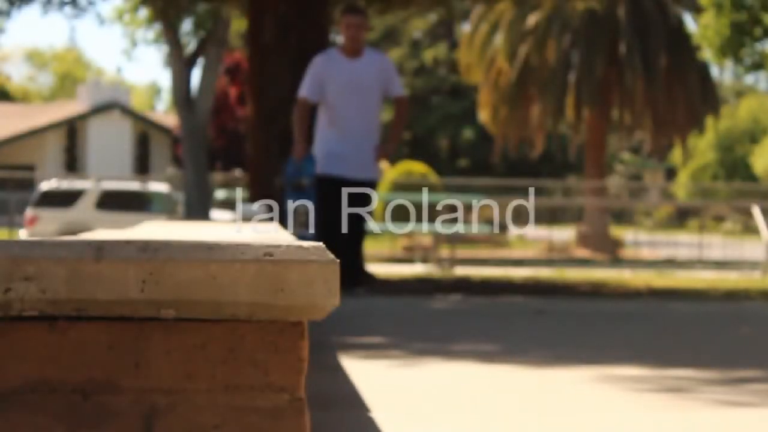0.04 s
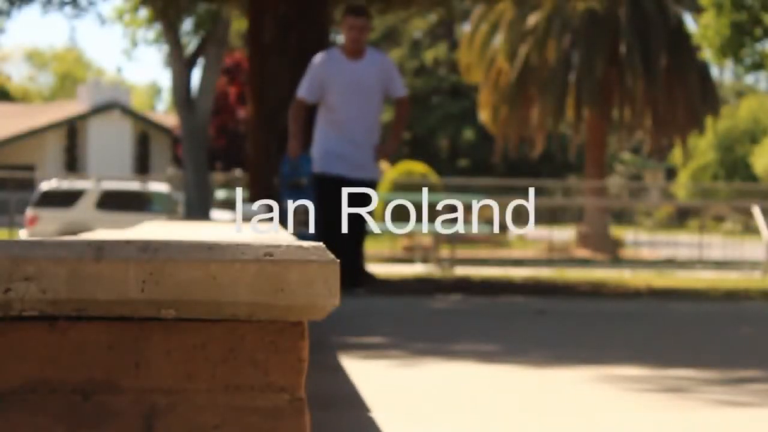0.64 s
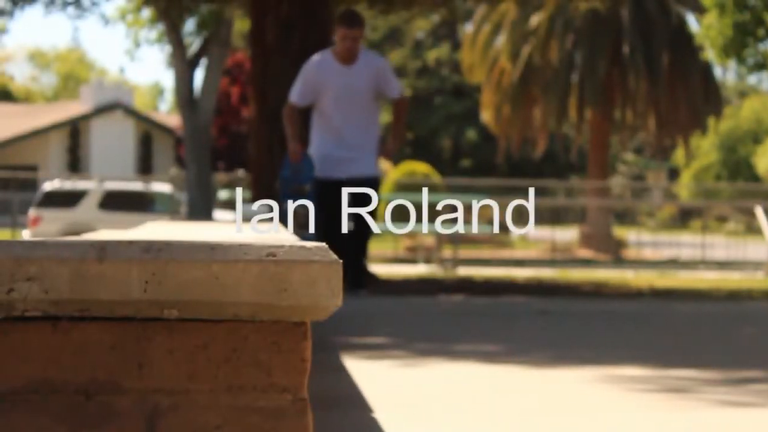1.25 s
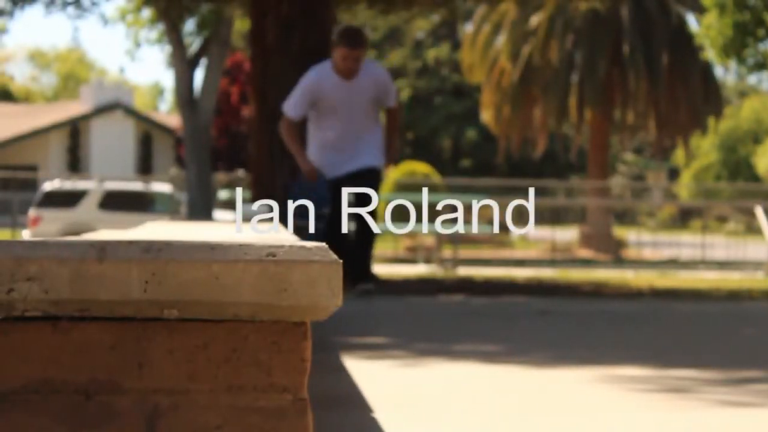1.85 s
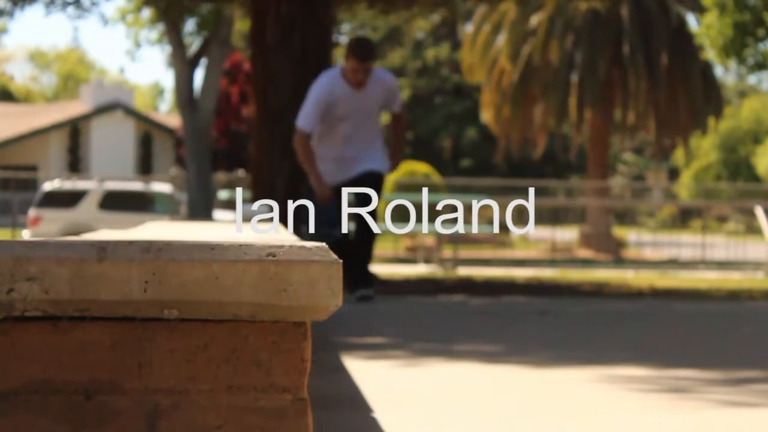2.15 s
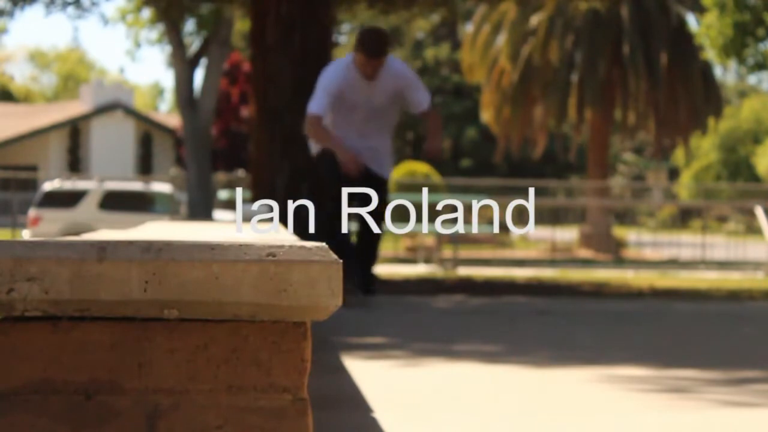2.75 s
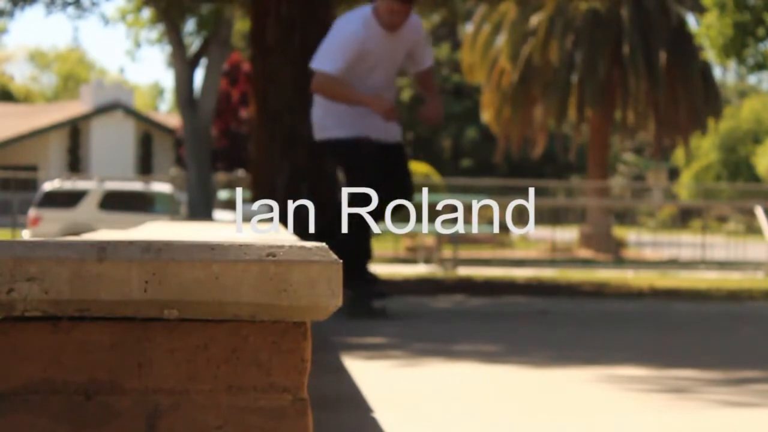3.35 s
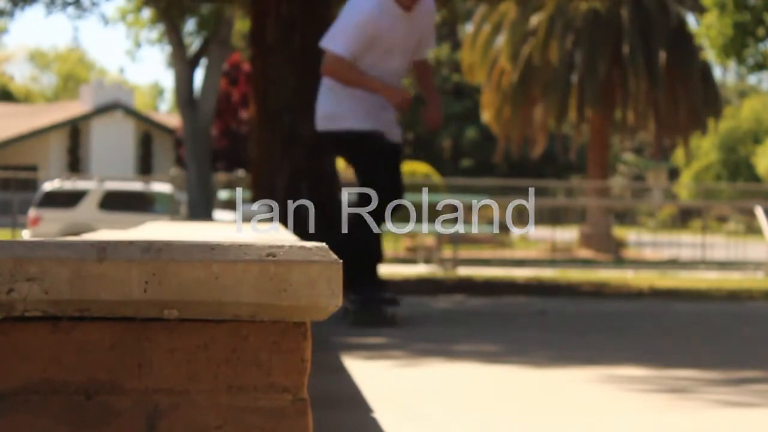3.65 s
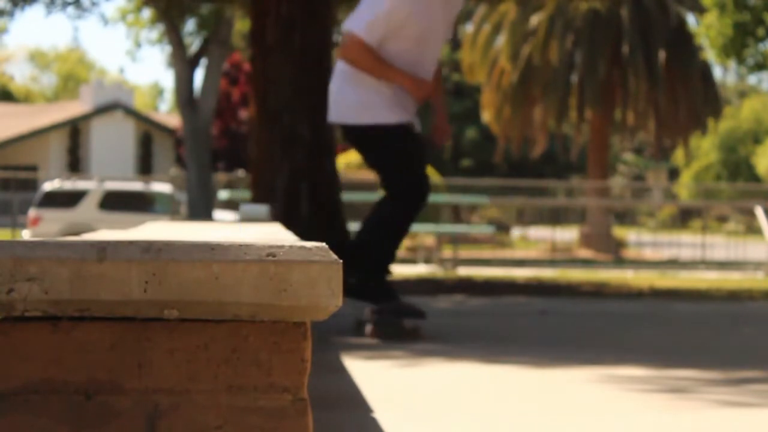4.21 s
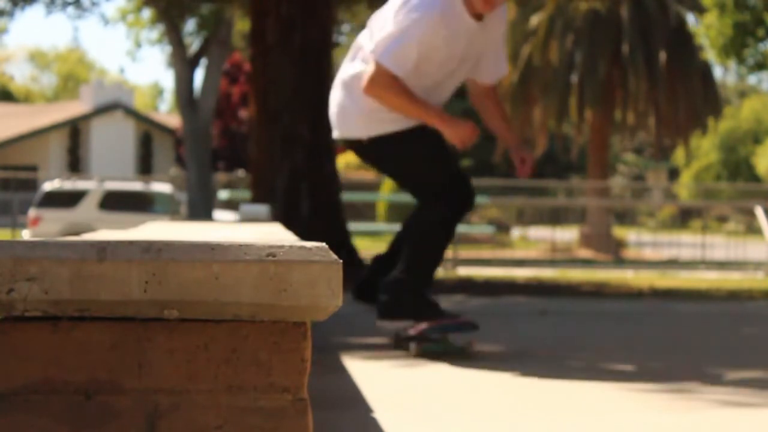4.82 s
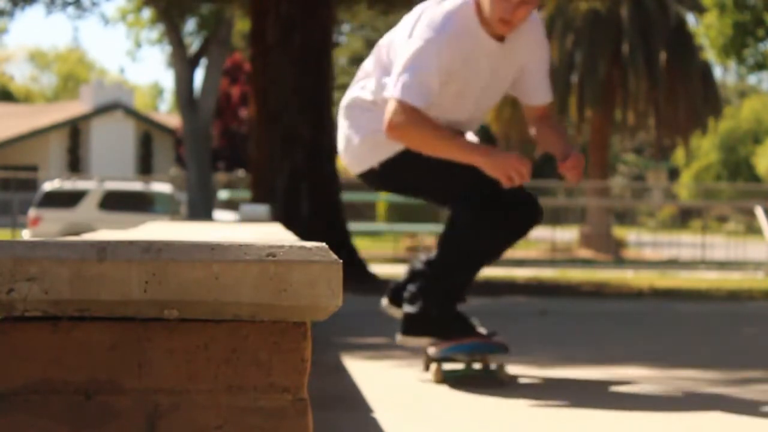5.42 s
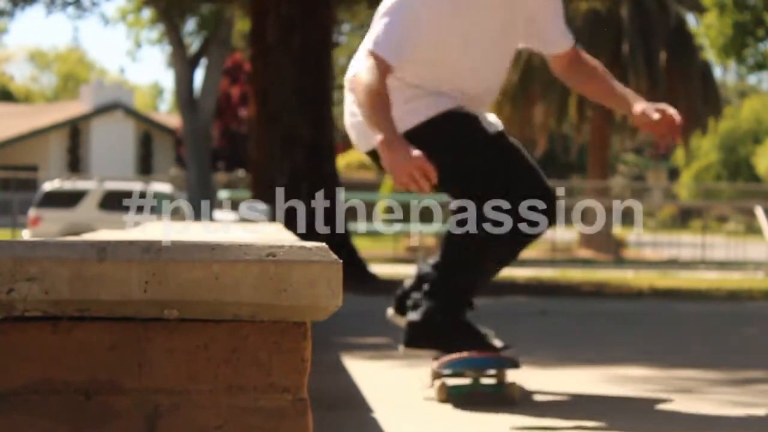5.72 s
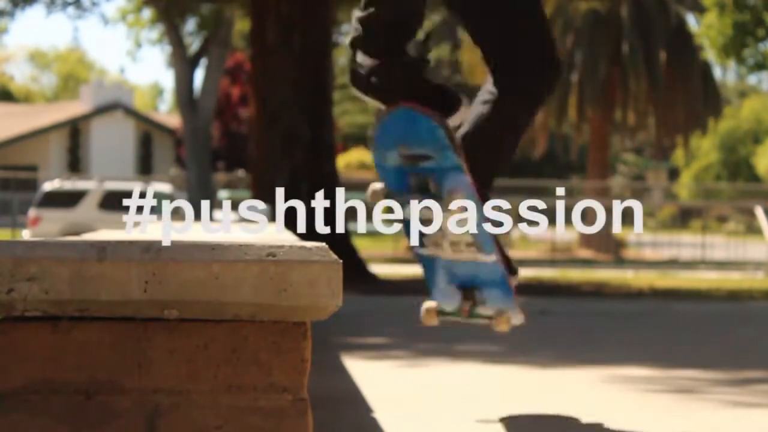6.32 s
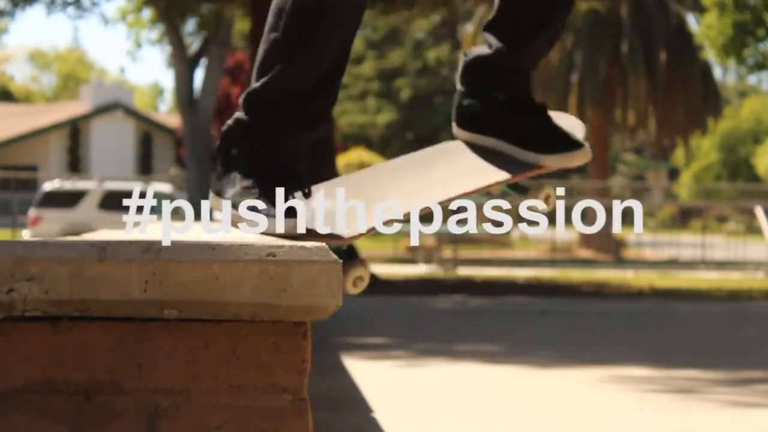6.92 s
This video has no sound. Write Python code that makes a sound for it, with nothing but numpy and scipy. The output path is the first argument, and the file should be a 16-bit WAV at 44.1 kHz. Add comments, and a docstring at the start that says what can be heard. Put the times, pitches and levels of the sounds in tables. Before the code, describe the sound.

A soft hush of distant traffic and leaves lies over a quiet street throughout. A faint step comes at about 1.8 seconds, then a brief shoe scuff. Around 2.5 seconds a skateboard drops onto concrete with three clacks and rolls with a hollow sound. Feet thump onto the deck at 2.9 seconds, with two more knocks at about 3.3 and 3.6. The wheels rumble closer, growing louder and grittier, with short wavering hums from the board. At 6.2 seconds the tail pops with a very loud, sharp crack, and the rolling drops away. A third of a second later the board slams onto a ledge with a second crack and a thud of feet. Both hits are close, leave a thin echo and briefly overload the microphone, which dips in level. The board rolls along the ledge with light knocks and faint metal jingles until about 7 seconds.

```python
"""A skateboard jump onto a ledge

On a quiet street a skateboarder steps off, drops his board, jumps on and rolls closer over concrete.
He snaps the tail down, flies for a third of a second, lands on a ledge and rolls along on two wheels.
Each blow makes the board ring, rattle and crack; rough ground makes it roar; loose metal jingles faintly.
The loudest cracks overload the microphone, which turns itself down for a moment."""
import sys
import numpy as np
from scipy import signal
from scipy.fft import rfft, irfft, next_fast_len
from scipy.io import wavfile
from scipy.ndimage import uniform_filter1d

SR = 44100
rng = np.random.default_rng(int(sys.argv[2]) if len(sys.argv) > 2 else 0)


def unload_audio(sound):
    """Save the sound as a 16-bit wav file, at the path given as the first command line argument."""
    columns = np.transpose(np.atleast_2d(sound))
    # keep every value between -1 and 1, then stretch to whole-number steps
    steps = np.round(np.clip(columns, -1, 1) * 32767)
    wavfile.write(sys.argv[1], SR, steps.astype(np.int16))


N = 311742
TIME = np.arange(N) / SR

# The tones of deck, axles and wheels. Each row: pitch in Hz, level in dB, seconds to fade by 60 dB (t60).
BOARD_TONES = [(105, -20, 0.13), (168.9, -24.5, 0.69), (236, -5, 0.029), (280, 1.5, 0.071),
               (378, -12.5, 0.31), (555, 1, 0.066), (606, -8, 0.037), (684.7, -1, 0.12), (755, 0, 0.018),
               (915, -14.5, 0.25), (1002, -12, 0.045), (1112, -14, 0.2), (1291, -4.5, 0.16),
               (1501, -6.5, 0.095), (1801, -6, 0.11), (1840, -8, 0.021), (2180, -6.5, 0.11)]
# The dense rattle under those tones. Each row: frequency in Hz, level in dB.
RATTLE_COLOUR = [(40, -28), (100, -8), (250, -2), (450, -5.5), (800, -0.5), (1500, -5.5), (3000, -9),
                 (6000, 4), (12000, -3)]
# The bright crack of a hard hit. Each row: frequency in Hz, level in dB.
CRACK_COLOUR = [(300, 2), (1200, 4), (2200, 3.5), (3200, -3), (3800, -4), (4450, -7), (5300, -7.5),
                (5800, -14), (6500, -11), (9000, -15), (12000, -23.5)]

def board_blows(rattle_t60=0.12, crack_t60=0.04, chatter_t60=0.19, rise_s=0.00056, lowest_hz=85):
    """Each blow starts with a crack, rings the board's tones and shakes its loose parts."""
    out, t = np.zeros(N), TIME[:SR // 4]
    tone_hz, tone_db, tone_t60 = np.transpose(BOARD_TONES)
    for s, db, *spring, crack_db, stretch in [*wheel_knocks(), *foot_stomps(), *board_slams()]:
        strength, detune, side = rng.standard_normal((3, len(BOARD_TONES)))
        gains = from_db(tone_db + strength) * springy_contact(tone_hz, *spring)
        gains *= np.sign(side) / np.linalg.norm(gains)   # the sign depends on where the board is struck
        pitch = tone_hz * (1 + 0.0088 * detune)   # the rider's feet shift the tones
        ring = gains @ (np.sin(2 * np.pi * np.outer(pitch, t)) * fade(t, stretch * tone_t60[:, None]))
        rattle = noise(lambda hz: gain_at(RATTLE_COLOUR, hz) * springy_contact(hz, *spring), len(t))
        body = from_db(-2) * ring + from_db(-7) * rattle * fade(t, stretch * rattle_t60)
        crack = noise(lambda hz: gain_at(CRACK_COLOUR, hz), len(t))
        crack *= fade(t, stretch * crack_t60) + from_db(-13) * fade(t, stretch * chatter_t60)
        rise = 1 - np.exp(-t / rise_s)
        add(out, s, from_db(db) * (body + from_db(crack_db) * crack) * rise)
    return highpass(out, lowest_hz)   # a narrow deck gives off no deep bass


def springy_contact(hz, contact_hz, sharpness, boom_db, boom_hz):
    """A wheel or tail is a spring: it favours one pitch and passes little above. Weight adds a boom."""
    ratio = hz / contact_hz
    resonance = (1 - ratio ** 2) ** 2 + (ratio / sharpness) ** 2
    softness = 1 + (ratio / 1.7) ** 2
    boom = from_db(boom_db * bell(hz, boom_hz, 0.49 * boom_hz) ** 2)
    return boom / np.sqrt(resonance * softness)


# The tail pops, then an axle meets the ledge. Each row: start in seconds, level in dB, contact pitch
# in Hz, its sharpness, crack in dB, ring time factor, graze level in dB, seconds until the rebound.
BOARD_SLAMS = [(6.2271, 15, 940, 3, -9.5, 0.55, -17, 0.0265),
               (6.5597, 15.5, 1450, 7.2, -12.5, 0.25, 1, 0.0193)]

def board_slams(graze_s=0.00478, boom_db=-7.5, boom_hz=220):
    """An edge grazes first, then comes the hard blow and a bright rebound."""
    for s, db, hz, sharpness, crack_db, stretch, graze_db, rebound_s in BOARD_SLAMS:
        yield s - graze_s, graze_db, hz, sharpness, boom_db, boom_hz, -29, stretch
        yield s, db, hz, sharpness, boom_db, boom_hz, crack_db, stretch
        yield s + rebound_s, db - 12.5, 1700, 1.8, boom_db, boom_hz, -25, 0.76


# Feet come down. Each row: start in seconds, slap level in dB, contact pitch in Hz, crack in dB,
# ring time factor, seconds until the thud, thud level in dB, boom pitch in Hz.
FOOT_STOMPS = [(1.808, -24, 650, -23, 1.15, 0.002, -18.5, 235), (2.889, -7, 2200, -8, 0.95, 0.0092, 5, 293),
               (2.9415, -9, 860, -16, 1.35, 0.0105, -8.5, 340),
               (3.3216, -2.5, 774, -16, 1.4, 0.011, -8, 240), (3.624, -3, 910, -19, 1.05, 0.017, -3.5, 291),
               (6.588, -3.5, 1390, -15, 0.91, 0.008, 7, 247.2),
               (6.624, -10.5, 796, -13, 1.05, 0.0038, -8, 370)]

def foot_stomps(slap_sharpness=1.35, slap_boom_db=5, thud_hz=800, thud_sharpness=2.2, thud_boom_db=20):
    """The sole slaps, then the rider's weight arrives with a dull thud."""
    for s, db, hz, crack_db, stretch, lag_s, thud_db, boom_hz in FOOT_STOMPS:
        yield s, db, hz, slap_sharpness, slap_boom_db, boom_hz, crack_db, stretch
        yield s + lag_s, thud_db, thud_hz, thud_sharpness, thud_boom_db, boom_hz, -24.5, stretch


# Wheels hit the ground or the ledge. Each row: start in seconds, level in dB, contact pitch in Hz,
# crack in dB, ring time factor.
WHEEL_KNOCKS = [(2.464, -9, 1084, -19, 1.58), (2.565, -12, 960, -20.5, 1.67), (2.697, -12, 900, -19.5, 1.4),
                (6.785, -18.5, 1050, -31, 1.8), (6.851, -20, 900, -18, 1.8), (6.936, -19.5, 1010, -24, 1),
                (6.984, -24, 1240, -14.5, 0.98), (7.056, -30.5, 1220, -10, 1.1)]

def wheel_knocks(sharpness=3.1, boom_db=7, boom_hz=217, next_wheel_s=0.012):
    """One wheel knocks, and its neighbour follows, softer and lower."""
    for s, db, hz, crack_db, stretch in WHEEL_KNOCKS:
        yield s, db, hz, sharpness, boom_db, boom_hz, crack_db, stretch
        yield s + next_wheel_s, db - 8, hz * 0.67, sharpness, boom_db, boom_hz, crack_db, stretch


# The board rolling under its rider. Each row: frequency in Hz, level in dB.
RIDDEN_COLOUR = [(24, -49), (40, -60), (69, -18), (164, -11), (264, 1), (335, -6), (435, -5.5),
                 (514, -11.5), (566, -6.5), (809, -6), (1190, -15.5), (1540, -19), (4400, -34), (8390, -42),
                 (12000, -27.5), (15600, -76), (22000, -120)]
# Pitches that the rolling brings out. Each row: pitch in Hz, width in Hz, strength in dB.
RIDDEN_PEAKS = [(76, 31, 8), (267, 6.5, -12), (710, 59, -10.5), (810, 300, -18), (1460, 210, -5),
                (5800, 210, -1), (8120, 1200, 3.5)]
# The hollow roar of the board with nobody on it. Each row: frequency in Hz, level in dB.
RIDERLESS_COLOUR = [(210, -39), (350, -8), (537, -2.5), (651, -5.5), (745, -1), (896, -13), (974, -12),
                    (1160, -7), (1470, -27), (2130, -15), (2600, -39), (3380, -68), (5720, -120)]
# Four phases: riderless, ridden, the roar's faint echo dying away after take-off, along the ledge.
# Each row: start, end, rise time and fade time in seconds, then deck rumble, wheel roar and grit hiss
# in dB at the closest point.
ROLL_PHASES = [(2.47, 2.88, 0.17, 0.92, -32.5, -19, -33.5), (2.9, 6.26, 0.02, 0.67, -29.5, -26, -40.5),
               (6.26, 6.73, 0.03, 2.5, -76, -41, -52.5), (6.69, 6.95, 0.051, 0.59, -35, -34.5, -48.5)]

def rolling(grains_per_s=4000):
    """Grains of concrete drum on wheels and deck, louder when the board is faster and nearer."""
    grains = (rng.random(N) < grains_per_s / SR) * rng.standard_normal(N)
    grains *= from_db(np.minimum(rng.exponential(1, N), 4))
    ground = rms_one(grains) + 1.02 * rng.standard_normal(N)

    def ridden(hz):
        peaks = sum(from_db(db) * bell(hz, centre, width) ** 2 for centre, width, db in RIDDEN_PEAKS)
        return gain_at(RIDDEN_COLOUR, hz) * (1 + peaks)

    def band(colour, low_hz, high_hz):
        return shaped(ground, lambda hz: colour(hz) * (below(hz, high_hz) - below(hz, low_hz)))

    pace, nearness = travel()
    rumble = band(ridden, 35, 446) * pace ** 0.47 * nearness ** 0.89   # the rumble carries further
    rumble *= from_db(0.5 * drift(42))
    hollow = band(lambda hz: gain_at(RIDERLESS_COLOUR, hz), 440, 1700) * pace ** 1.24 * nearness
    roar = band(ridden, 393, 2170) * pace ** 1.24 * nearness
    hiss = band(ridden, 1950, 9500) * pace ** 2.15 * nearness
    out = np.zeros(N)
    for phase, (start, end, rise_s, t60, rumble_db, roar_db, hiss_db) in enumerate(ROLL_PHASES):
        swell = np.clip((TIME - start) / rise_s, 0, 1) * fade(np.maximum(TIME - end, 0), t60)
        wheels = hollow if phase == 0 else roar
        out += swell * (from_db(rumble_db) * rumble + from_db(roar_db) * wheels + from_db(hiss_db) * hiss)
    return out * from_db(0.73 * drift(28))   # uneven ground makes the level bob


# How fast the board goes. Each row: time in seconds, speed in metres per second.
BOARD_SPEED = [(2.46, 1.89), (3.9, 2.13), (4.6, 3), (6.25, 2.84)]

def travel(pass_s=6.43, closest_m=3.09):
    """The board passes in a straight line. Gives its speed and nearness, both 1 at the closest point."""
    speed = np.interp(TIME, *np.transpose(BOARD_SPEED))
    metres = np.cumsum(speed) / SR
    distance = np.hypot(closest_m, metres - np.interp(pass_s, TIME, metres))
    return speed / np.interp(pass_s, TIME, speed), closest_m / distance


# The deck hums as the rider's weight shifts. Each row: start and length in seconds, pitch in Hz,
# level in dB.
DECK_HUMS = [(3.0, 0.23, 328, -29), (3.47, 0.11, 294, -28.5), (3.75, 0.12, 288, -30.5),
             (5.58, 0.15, 258.6, -30), (5.94, 0.11, 262, -27), (6.78, 0.13, 261.4, -29.5)]
# The wheels sing as he presses on the tail. Each row: the same as for the hums.
WHEEL_NOTES = [(6.04, 0.12, 598, -28), (6.185, 0.1, 691, -17)]

def board_hum(swells, waver, flutter):
    """The turning wheels stir up one rough, wavering tone in short swells."""
    clock = np.cumsum(1 + waver * drift(72.2)) / SR
    pressure = 1 + flutter * np.tanh(drift(52))
    out = np.zeros(N)
    for s, length, hz, db in swells:
        swell = np.abs(np.sin(np.pi * np.clip((TIME - s) / length, 0, 1))) ** 0.45
        out += from_db(db) * swell * np.sin(2 * np.pi * hz * clock)
    return np.sqrt(2) * out * pressure


# Shoes scrape. Each row: start and length in seconds, level in dB, first and last pitch in Hz,
# width as a share of the pitch.
SHOE_SCUFFS = [(1.218, 0.0059, -41, 4270, 3340, 0.34), (2.141, 0.055, -35.5, 3800, 2250, 1)]

def shoe_scuffs(lowest_hz=1350):
    """A sole rubs briefly: a dry hiss that swells and sinks in pitch."""
    out, t = np.zeros(N), TIME[:SR // 8]

    def rub(centre, width):
        return noise(lambda hz: bell(hz, centre, width) ** 2 * (1 - below(hz, lowest_hz, 10)), len(t))

    for s, length, db, first_hz, last_hz, width in SHOE_SCUFFS:
        along = np.clip(t / length, 0, 1)
        first, last = rub(first_hz, width * first_hz), rub(last_hz, width * last_hz)
        swell = np.abs(np.sin(np.pi * along)) ** 0.29
        add(out, s, from_db(db) * swell * (0.6 * np.sqrt(1 - along) * first + along * last))
    return out


# Clear touches of loose metal. Each row: start in seconds, level in dB.
METAL_TOUCHES = [(3.034, -52), (3.133, -44.5), (6.389, -51), (6.579, -37)]
# The tones of that metal. Each row: pitch in Hz, level in dB, seconds to fade by 60 dB.
METAL_TONES = [(5566, -7, .45), (6320, -4, .14), (6600, -8, .4), (7112, 1, .5), (8265, -4, .45),
               (9760, -9, .3), (10435, -5, .45), (10930, -5, .4), (11316, 1, .16)]

def metal_jingles(ledge_touches=4, ledge_db=-49, bounce_s=0.017):
    """Small metal parts touch, bounce once and ring; from the ledge on they also touch by chance."""
    out, t = np.zeros(N), TIME[:SR // 2]
    ledge_s = ROLL_PHASES[-1][0]
    along = (np.arange(ledge_touches) + rng.random(ledge_touches)) / ledge_touches
    touches = METAL_TOUCHES + [(s, ledge_db) for s in ledge_s + (TIME[-1] - ledge_s) * along]
    bounces = [(s + bounce_s * rng.uniform(0.83, 1.1), db - 3.5) for s, db in touches]
    for s, db in touches + bounces:
        ring = sum(from_db(tone_db + 2.5 * rng.standard_normal())   # a new mix of tones each time
                   * np.sin(2 * np.pi * hz * t) * fade(t, t60) for hz, tone_db, t60 in METAL_TONES)
        tick = noise(lambda hz: bell(hz, centre=8500, width=5000) ** 2, len(t)) * fade(t, t60=0.049)
        add(out, s, from_db(db) * (from_db(-8) * ring + from_db(-10) * tick))
    return out


# The tone of the street's echo. Each row: frequency in Hz, level in dB.
ECHO_COLOUR = [(60, -3), (250, 16.5), (700, 7), (1500, 8), (4000, 9), (12000, -1.5)]

def street_echo(x, echo_db=-20, t60=0.46, build_s=0.0047):
    """Houses, fence and trees scatter a thin echo back."""
    t = TIME[:SR]
    tail = noise(lambda hz: gain_at(ECHO_COLOUR, hz), len(t)) * fade(t, t60)
    tail *= 1 - np.exp(-(t / build_s) ** 2)
    return from_db(echo_db) * signal.fftconvolve(x, tail / np.linalg.norm(tail))[:N]


# The street's steady hush. Each row: frequency in Hz, level in dB.
STREET_COLOUR = [(25, -14), (50, -7), (90, 0), (160, -4.5), (260, -1.5), (350, -6), (500, -4.5),
                 (1000, -14.5), (2000, -20), (3200, -23.5), (5200, -27.5), (7500, -26), (10500, -25),
                 (12000, -28.5)]

def street_hush(level_db=-48):
    """Distant traffic and leaves blend into a soft noise that wavers a little."""
    return from_db(level_db + 0.5 * drift(2.8)) * noise(lambda hz: gain_at(STREET_COLOUR, hz))


def from_db(db):
    """Turn decibels into a gain."""
    return 10 ** (np.asarray(db) / 20)


def rms_one(x):
    """Scale a sound to an average power of 1."""
    return x / np.sqrt(np.mean(x ** 2) + 1e-20)


def gain_at(colour, hz):
    """Read a colour table's gain at the given frequencies."""
    row_hz, row_db = np.transpose(colour)
    return from_db(np.interp(np.log(hz + 1), np.log(row_hz), row_db))


def shaped(x, gain):
    """Colour a sound with a gain for each frequency, then set its power to 1."""
    size = next_fast_len(len(x))
    spectrum = rfft(x, size) * gain(np.fft.rfftfreq(size, 1 / SR))
    return rms_one(irfft(spectrum, size)[:len(x)])


def noise(gain, size=N):
    """Coloured noise of power 1."""
    return shaped(rng.standard_normal(size), gain)


def drift(rate_hz, step=32):
    """A smooth random wobble, about 1 in size."""
    coarse = noise(lambda hz: 1 / (1 + (hz / step / rate_hz) ** 2), N // step + 2)
    return np.interp(np.arange(N) / step, np.arange(len(coarse)), coarse)


def bell(hz, centre, width):
    """A gain that peaks at one pitch."""
    return 1 / np.sqrt(1 + (2 * (hz - centre) / width) ** 2)


def below(hz, edge_hz, steepness=8):
    """A gain that keeps what lies below an edge."""
    return 1 / (1 + (hz / edge_hz) ** steepness)


def highpass(x, hz):
    """Thin out the bass."""
    return signal.sosfilt(signal.butter(2, hz, "high", fs=SR, output="sos"), x)


def fade(t, t60):
    """Die away by 60 dB every t60 seconds."""
    return np.exp(-np.log(1000) * t / t60)


def add(out, s, sound):
    """Mix a sound in, starting at s seconds."""
    start = round(s * SR)
    out[start:start + len(sound)] += sound[:max(N - start, 0)]


def automatic_gain(x, threshold_db=-2, recover_db_per_s=16, lag_s=0.011, attack_s=0.007):
    """The microphone turns itself down just after a crack overloads it, then creeps back up."""
    level_db = 10 * np.log10(np.abs(uniform_filter1d(x ** 2, size=90)) + 1e-12)
    over_db = np.maximum(np.interp(TIME - lag_s, TIME, level_db) - threshold_db, 0)
    recovery_db = recover_db_per_s * TIME
    held_db = np.maximum.accumulate(over_db + recovery_db) - recovery_db
    smooth = np.exp(-1 / (attack_s * SR))
    return x * from_db(-signal.lfilter([1 - smooth], [1, -smooth], held_db))


def scene():
    """Board, shoes and street at one microphone."""
    hits = board_blows() + shoe_scuffs() + metal_jingles()
    wheels = rolling() + board_hum(DECK_HUMS, waver=0.0658, flutter=0.91)
    wheels += board_hum(WHEEL_NOTES, waver=0.0458, flutter=0.31)
    street = street_hush()
    return (hits + street_echo(hits) + wheels + street)[None]


def record(dry, mic_top_hz=11900, cutoff_hz=15800):
    """The microphone loses the highest treble and turns down too late, so the loudest cracks clip."""
    heard = signal.sosfilt(signal.ellip(8, 0.3, 60, mic_top_hz, fs=SR, output="sos"), dry[0])
    clipped = np.clip(automatic_gain(heard), -0.98, 0.98)
    return signal.sosfilt(signal.butter(12, cutoff_hz, fs=SR, output="sos"), clipped)[None]


dry = scene()
out = record(dry)
unload_audio(out)
```